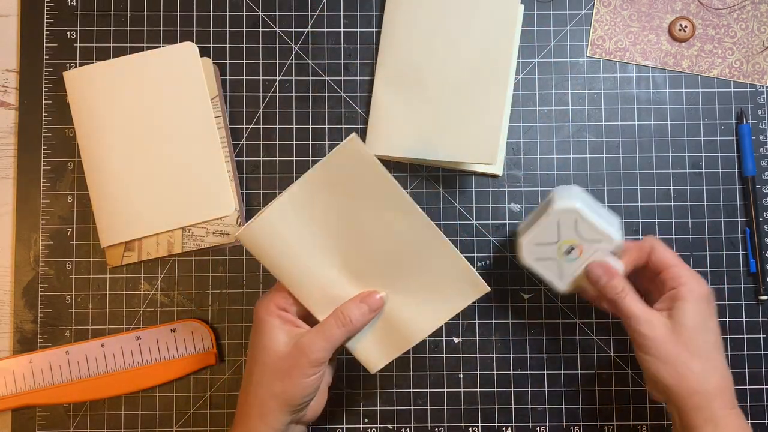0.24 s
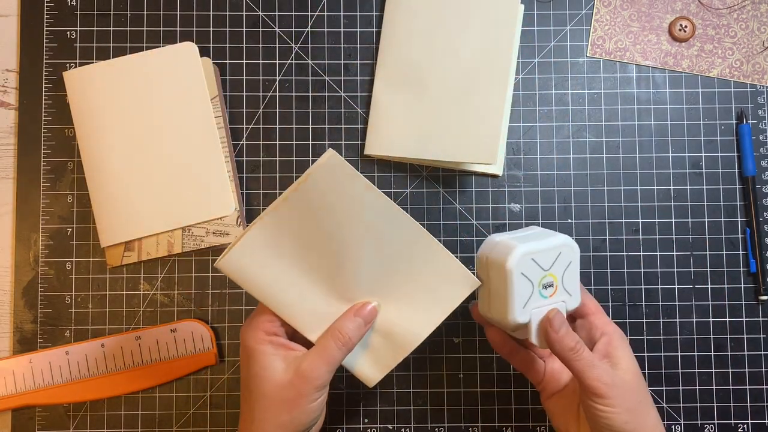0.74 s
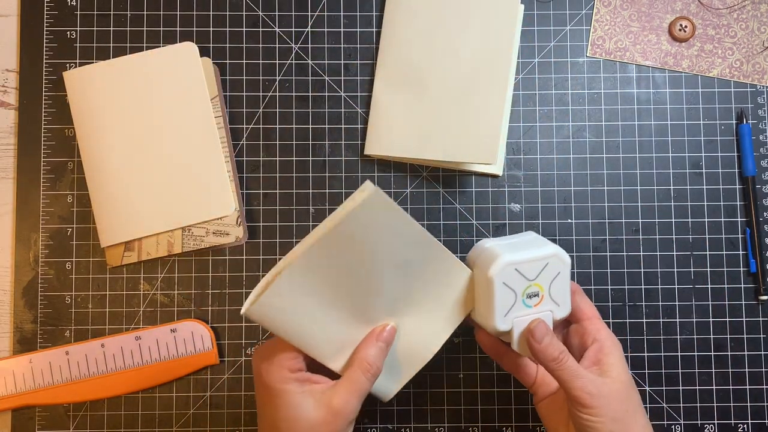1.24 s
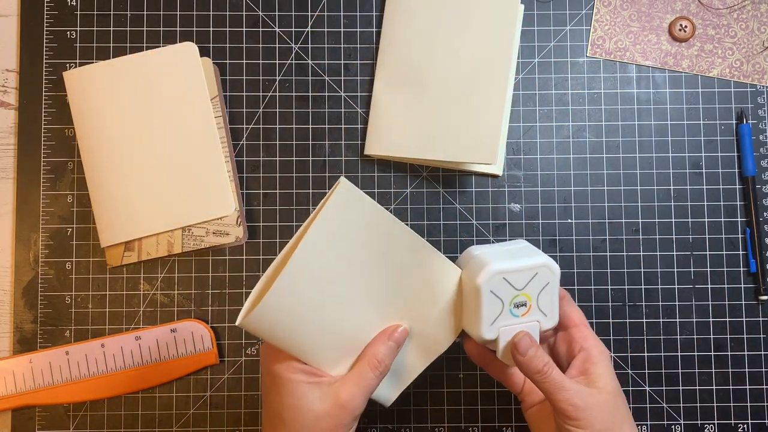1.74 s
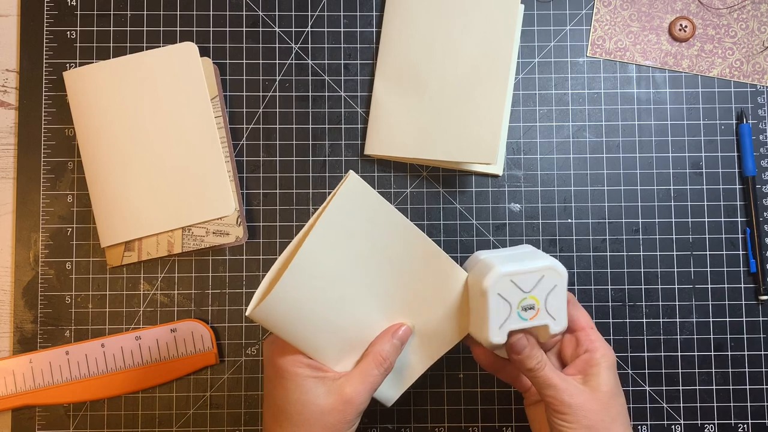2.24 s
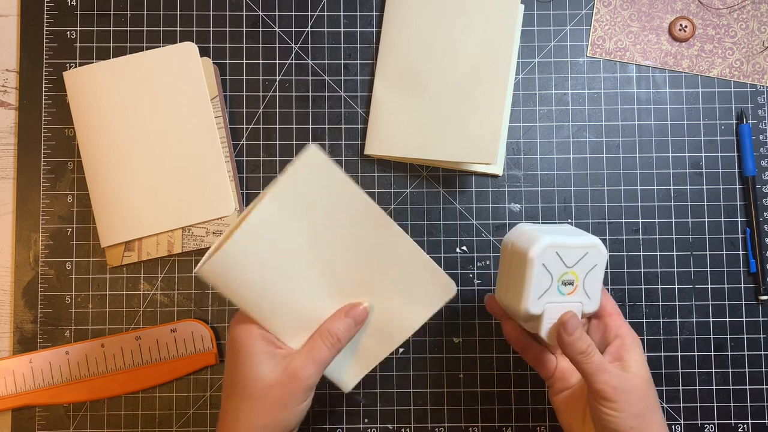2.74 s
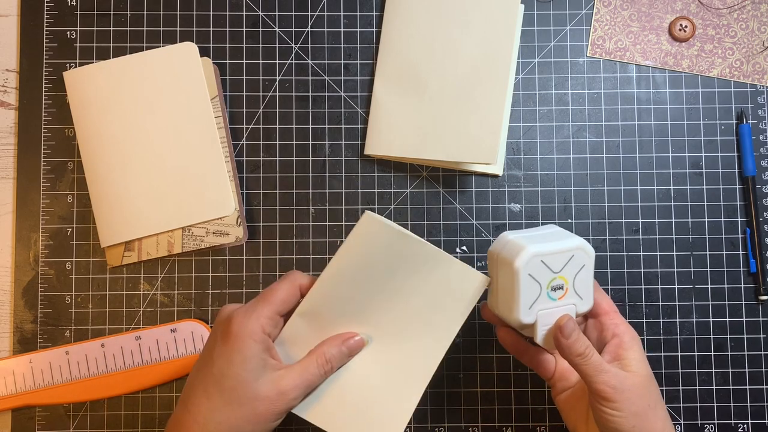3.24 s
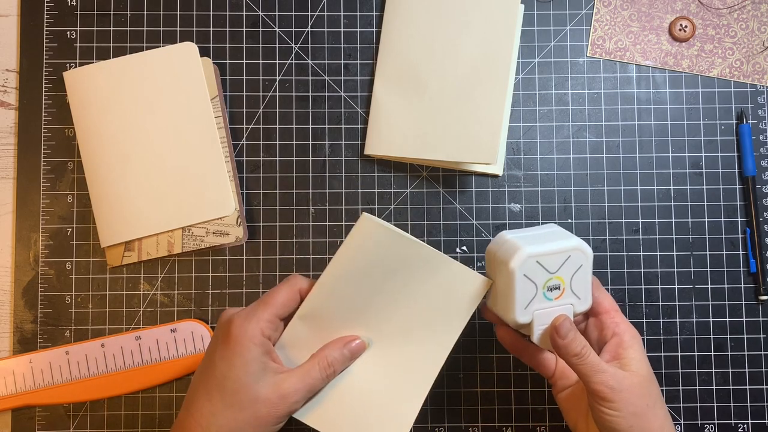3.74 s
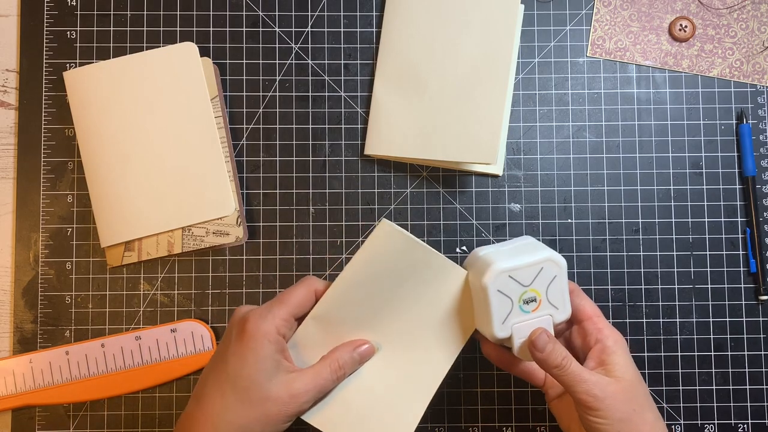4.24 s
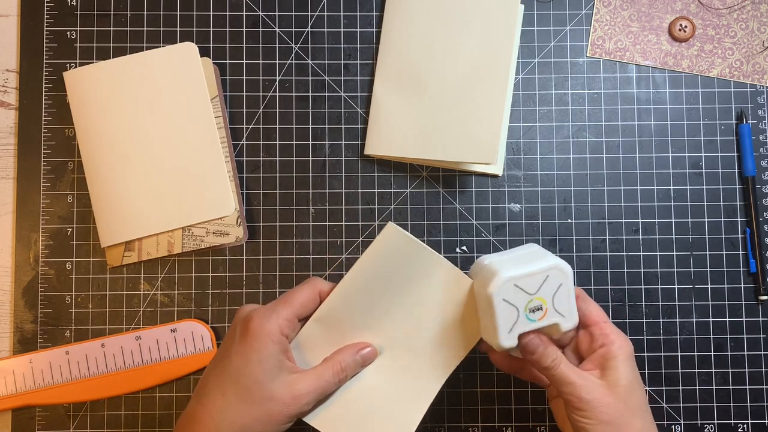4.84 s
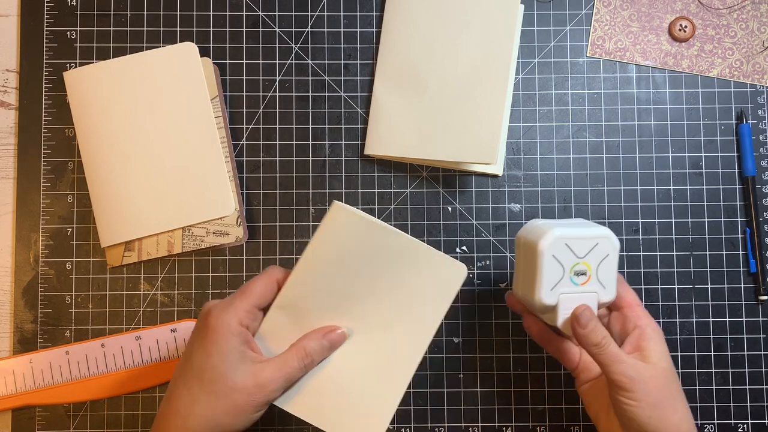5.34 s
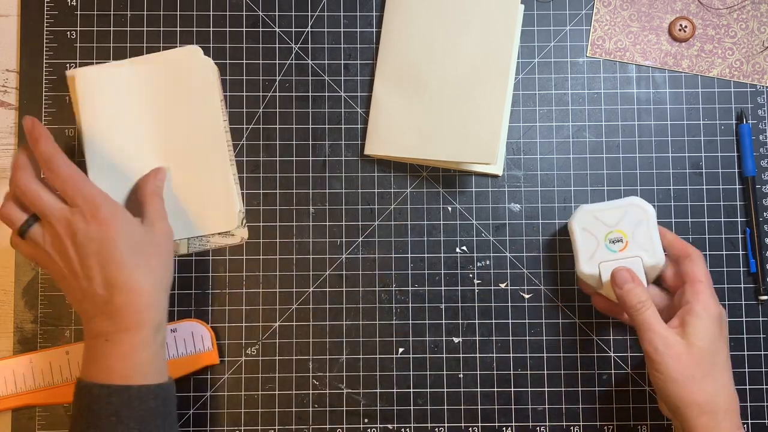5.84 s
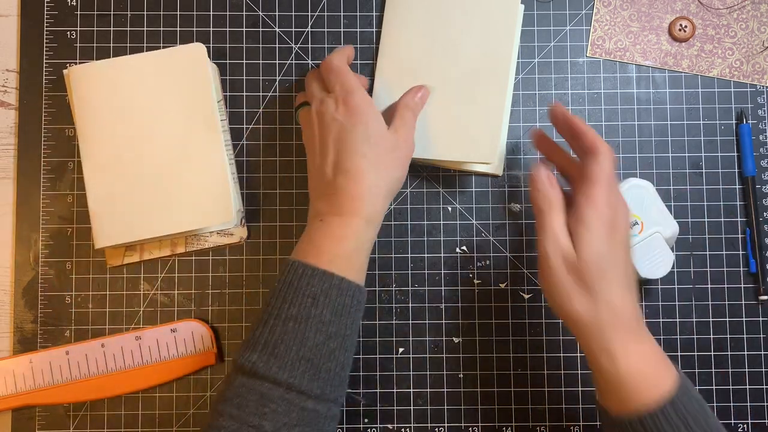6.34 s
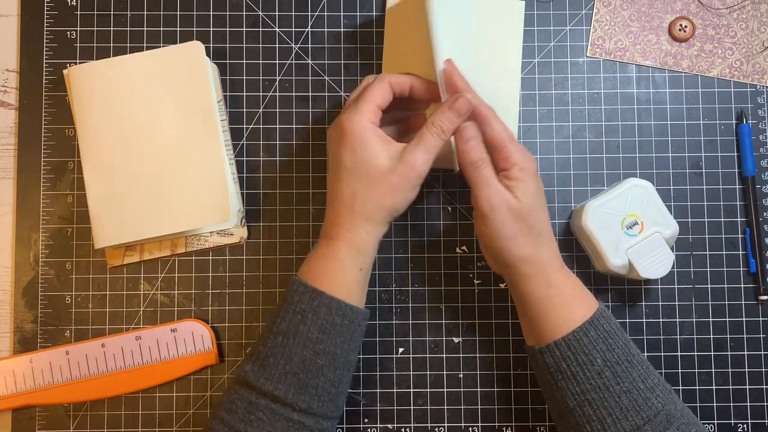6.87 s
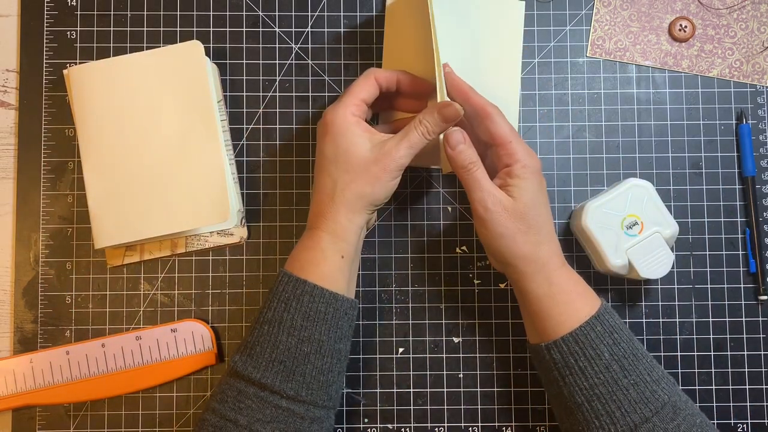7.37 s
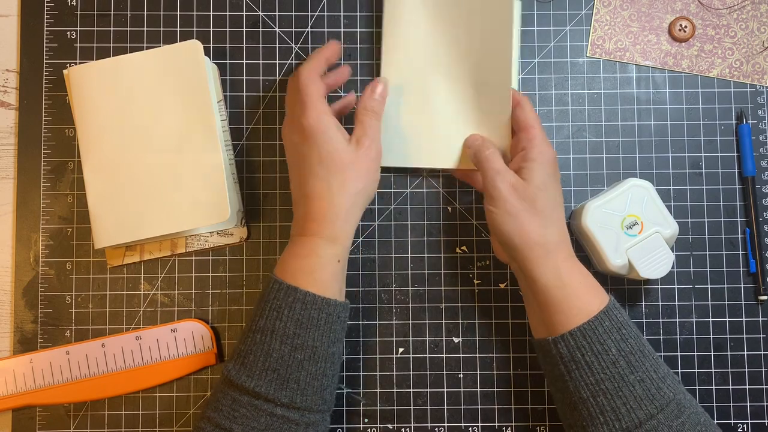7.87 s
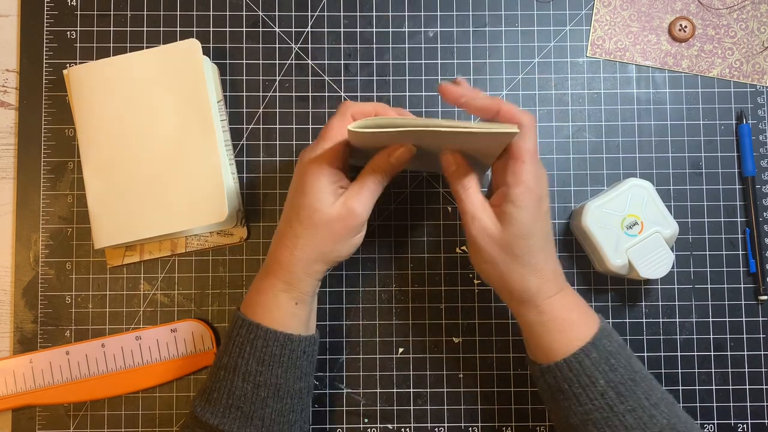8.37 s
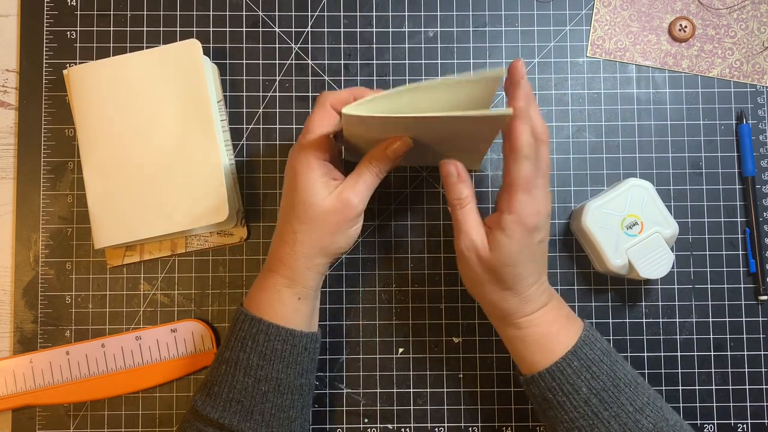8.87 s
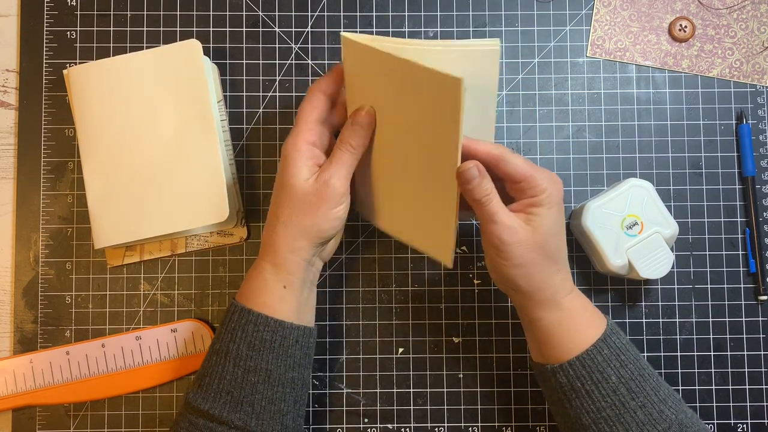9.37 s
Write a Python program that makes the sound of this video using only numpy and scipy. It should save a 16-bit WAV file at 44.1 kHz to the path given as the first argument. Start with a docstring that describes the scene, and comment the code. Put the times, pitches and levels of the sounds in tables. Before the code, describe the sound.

Card slides and ticks lightly in the hands at the start, with a few soft bumps on a table. At about 2.2 seconds a plastic corner punch snaps sharply through the folded card; its lever clicks back near 2.4 seconds and the steel spring rings faintly for about a second. Quiet rustles and scattered ticks follow. A second snap comes at about 4.8 seconds, with release clicks and a brief paper scrape around 5 seconds. Near 6.1 seconds the punch is set down with a short clattering knock, the loudest sound, and its spring rings faintly again. From about 6.5 seconds to 9.5 seconds, sheets slide, flick and tap in the hands, busiest around 8 seconds. Everything is close, in a small quiet room with a faint, steady low appliance hum.

```python
"""Sheets of card slide and tick in the hands, with light knocks on a table, while appliances hum in a
small quiet room. A plastic corner punch snaps twice through folded card above a cutting mat, then is
set down. Friction makes the sheets hiss; impacts excite the damped modes of housing and table, and
the punch's steel spring sings on in free vibration. Two close microphone ports hear everything with
a fixed phase lead between them."""
import sys
import numpy as np
from scipy import signal
from scipy.fft import rfft, irfft, next_fast_len
from scipy.io import wavfile
from scipy.ndimage import uniform_filter1d, map_coordinates

SR = 44100
rng = np.random.default_rng(int(sys.argv[2]) if len(sys.argv) > 2 else 0)


def dump_mix(stems):
    """Bounce the given channels to the path in sys.argv[1] as a 16-bit WAV at rate SR."""
    frames = np.atleast_2d(stems).T  # one column per channel
    limited = np.clip(frames, -1, 1)  # hard clip at full scale
    pcm = np.round(limited * 32767).astype(np.int16)
    wavfile.write(sys.argv[1], SR, pcm)


N = 423801
BEFORE = SR // 100  # samples of build-up ahead of each contact

# Cuts: (touch [s], break [s], lever let go [s], break level [dB], bite re break [dB], spring level [dB])
CUTS = [(2.1748, 2.2128, 2.39, -16, -11.5, -56.5), (4.7408, 4.77, 4.94, -15, -8.5, -63.5)]


def amp(db):
    """Amplitude ratio of a level in decibels."""
    return 10 ** (np.asarray(db) / 20)


def unit(x):
    """Normalisation to an rms of 1."""
    return x / np.sqrt(np.mean(x ** 2) + 1e-20)


def along(points, hz):
    """Interpolation of (frequency [Hz], value) points on a logarithmic axis."""
    f, v = np.transpose(points)
    return np.interp(np.log(hz + 1), np.log(f + 1), v)


def wobble(rate):
    """Random modulation: a smooth curve with rate knots a second."""
    return map_coordinates(rng.standard_normal(int(N * rate / SR) + 4), [np.arange(N) * rate / SR])


def swell(count, rise, fall):
    """Exponential growth up to sample BEFORE, then decay; time constants in seconds."""
    t = (np.arange(count) - BEFORE) / SR
    return np.exp(np.minimum(t / rise, -t / fall))


def filtered(x, response):
    """Linear filtering: the spectrum of x times a complex frequency response."""
    n = x.shape[-1]
    m = next_fast_len(n + 8192)
    return irfft(rfft(x, m) * response(np.fft.rfftfreq(m, 1 / SR)), m)[..., :n]


def resonances(modes):
    """Modal response: damped resonators of alternating sign, summed."""
    return lambda f: sum((-1) ** k * amp(db) * 1j * f * width / (hz * hz - f * f + 1j * f * width)
                         for k, (hz, width, db) in enumerate(modes))


def paired(noise, gain):
    """Partial coherence: two independent noises mix as sum and difference at the ports."""
    # Likeness of the ports: (frequency [Hz], correlation [ratio])
    likeness = [(60, 1), (300, 0.21), (1400, 0.16), (3500, 0.98), (6000, 0.78), (8600, 1), (11000, .9),
                (16000, 1)]
    turn = lambda hz: np.arccos(np.clip(along(likeness, hz), 0, 1)) / 2
    mid, side = filtered(noise, lambda hz: gain(hz) * [np.cos(turn(hz)), np.sin(turn(hz))])
    return np.array([mid + side, mid - side])


def rush(spectrum, patchy_db=0, grain=1):
    """Modulated two-port noise of rms 1: bands drift in gain, and a grain envelope roughens it."""
    bands = signal.stft(grain * rng.standard_normal((2, N)), nperseg=256)[2]
    drift = uniform_filter1d(rng.standard_normal(bands.shape[1:]), size=3, axis=0)
    drift = uniform_filter1d(drift, size=30, axis=1)
    noise = signal.istft(bands * amp(patchy_db * unit(drift)), nperseg=256)[1][:, :N]
    return unit(paired(noise, lambda hz: amp(along(spectrum, hz))))


def add(track, s, sound):
    """Superposition of a sound on a track, with its contact at time s."""
    part = track[round(s * SR) - BEFORE:][:len(sound)]
    part += sound[:len(part)]


def jolt(body, rise, fall, push, rough, rattle):
    """Impact excitation: an impulse, a rough push and a weaker rattle drive a body's modes; energy 1."""
    n = SR // 4
    noise = rng.standard_normal(n)
    force = (push + rough * noise) * swell(n, rise, fall)
    force[BEFORE] += 1
    scatter = rng.standard_normal((len(body), 2))  # every blow lands and is held differently
    gripped = [(hz * (1 + .015 * a), width, db + 1.5 * b)
               for (hz, width, db), (a, b) in zip(body, scatter)]
    loose = [(hz, 3.2 * width, db) for hz, width, db in gripped]  # the rattle spreads around each mode
    ring = filtered(force, resonances(gripped))
    ring += filtered(rattle * noise * swell(n, rise, .014), resonances(loose))
    return ring / np.linalg.norm(ring)


def background():
    """Forced vibration: motor and mains tones waver in level and phase over steady room noise."""
    # Appliance tones: (frequency [Hz], level [dB], waver [dB])
    tones = [(58.7, -53.5, 2), (120, -63, 0.5), (52, -66, -4), (107, -79, 3.5), (171, -77, 0.5),
             (239, -79.5, -0.5)]
    # Room noise: (frequency [Hz], level [dB])
    air = [(25, -32), (50, -5.5), (90, 6), (150, -3), (300, -12.5), (600, -26), (1500, -29), (5000, -32),
           (9000, -33), (16000, -36.5)]
    t = np.arange(N) / SR
    hum = sum(amp(db + waver * wobble(3.5)) * np.sin(2 * np.pi * hz * t + 0.39 * wobble(5.3))
              for hz, db, waver in tones)
    return hum + amp(-66.5 + 0.55 * wobble(1.3)) * rush(air)


def sheets():
    """Friction noise: fibres catch in clumps and crinkle; broad faces boom and edges hiss."""
    # Slides and flicks: (start [s], end [s], level [dB], dullness [dB])
    strokes = [(0.023, 0.143, -64.5, -9), (0.181, 0.173, -58, -8), (0.245, 0.259, -63, 7),
               (0.343, 0.426, -74, -4.5), (1.228, 1.32, -66.5, 10.5), (1.279, 1.403, -58, -18),
               (1.412, 1.543, -72.5, 7.5), (1.768, 1.776, -66.5, 10), (2.419, 2.458, -63, 8),
               (2.473, 2.596, -73, 1), (2.763, 2.93, -55.5, -18), (2.951, 3.021, -73.5, 4),
               (3.151, 3.141, -64, -5), (3.485, 3.498, -74.5, 2), (4.03, 4.054, -73, -13),
               (4.086, 4.083, -54.5, 8), (4.964, 4.987, -50, 4), (5.097, 5.152, -64.5, 3.5),
               (5.409, 5.46, -66, -3.5), (5.51, 5.607, -66.5, -10), (5.68, 5.706, -75.5, -4),
               (5.757, 5.853, -60, -1), (5.937, 6.04, -77, 20.5), (6.159, 6.405, -80.5, 19.5),
               (6.414, 6.533, -72, 6), (6.656, 6.72, -77.5, 12), (6.771, 6.877, -63.5, 10),
               (6.896, 7.199, -74, 6), (7.22, 7.47, -84, 11), (7.487, 7.527, -71, -7.5),
               (7.608, 7.71, -67, -1), (7.708, 7.796, -73.5, -1), (7.827, 7.834, -56.5, 7.5),
               (7.882, 7.98, -64, 8), (7.998, 8.095, -54.5, 4.5), (8.11, 8.154, -63.5, 6.5),
               (8.183, 8.313, -72.5, -10.5), (8.337, 8.447, -64.5, 9), (8.628, 8.744, -73.5, 8),
               (8.754, 8.88, -81.5, 23), (8.899, 8.926, -65.5, 14), (8.946, 9.088, -83.5, 20),
               (9.135, 9.249, -61, 0.5), (9.285, 9.373, -67.5, -14), (9.374, 9.575, -78.5, 8)]
    # Four layers of sheet noise, low to high: (frequency [Hz], level [dB])
    flap = [(120, -16), (250, 4.5), (500, -4), (900, -1), (1500, -36.5)]
    rub = [(700, -21.5), (1100, -1), (1900, -1.5), (2800, -19)]
    scrape = [(1700, -11), (2500, -2), (4300, -2), (6200, -20)]
    hiss = [(3500, -21.5), (6000, 3), (8500, -1.5), (12000, -7.5), (16000, -21)]
    # Crinkle in each layer: (depth [ratio])
    depths = (.9, .7, 0.4, 0.2)
    # Narrow-band rubs of an edge: (start [s], end [s], frequency [Hz], level [dB])
    swishes = [(1.151, 1.257, 3550, -65), (6.92, 7.17, 3380, -77)]
    layer_db, dullness_slope = np.array([-11.5, -2.5, 0, -1.2]), np.array([1.28, 0.64, 0.023, -0.046])
    rise_db_per_s, fall_db_per_s = 540.5, 419.5
    t = np.arange(N) / SR
    power = np.zeros((4, N))
    for start, end, db, dull_db in strokes:
        near = slice(max(round((start - .1) * SR), 0), round((end + .15) * SR))
        ramp_db = np.minimum(rise_db_per_s * (t[near] - start), fall_db_per_s * (end - t[near]))
        mix_db = db + layer_db + dullness_slope * dull_db
        power[:, near] += amp(mix_db[:, None] + np.minimum(0, ramp_db)) ** 2
    clumps = amp(1.4 * wobble(35) + 1.2 * wobble(300))
    out = np.zeros((2, N))
    for layer_power, spectrum, depth in zip(power, (flap, rub, scrape, hiss), depths):
        catches = (rng.random(N) < 70 / SR) * rng.random(N)  # about 70 a second
        crinkle = uniform_filter1d(catches, size=150) * 150  # each lasts about 3 ms
        out += np.sqrt(layer_power) * rush(spectrum, patchy_db=3.3, grain=clumps * (1 + depth * crinkle))
    for start, end, hz, db in swishes:
        arch = np.sin(np.pi * np.clip((t - start) / (end - start), 0, 1)) ** .5
        out += amp(db) * arch * rush([(hz - 900, -30), (hz - 250, 0), (hz + 250, 0), (hz + 900, -30)])
    return out


def table_knocks():
    """Modal ringing of the table top, duller for softer impacts, with a bright crack at the contact."""
    # Things meeting the table: (time [s], level [dB], relative crack level [dB])
    knocks = [(0.087, -45.5, -21), (0.105, -47.5, -23), (0.111, -41.5, -27), (0.134, -40, -31),
              (0.231, -43.5, -13.5), (5.047, -41, -16.5), (5.902, -36, -32), (6.03, -24.5, -16),
              (6.052, -26.5, -10.5), (6.092, -8, -15), (6.118, -20, -25.5), (6.157, -39, -12),
              (8.344, -43.5, -7.5)]
    # Table modes: (frequency [Hz], bandwidth [Hz], level [dB])
    modes = [(75, 8, 3.5), (117.5, 30, -4), (225.3, 40.5, 1.5), (315, 13, 8), (440, 90, 0), (740, 120, -2),
             (1070, 70, -5), (1345, 150, -1.5), (2050, 200, -14)]
    soften = .22  # dB per octave lost above 500 Hz for each dB that a knock is softer
    crack_gain = lambda hz: amp(along([(800, -24.5), (2500, 3.0), (16000, -6.0)], hz))
    out, n = np.zeros(N), SR // 8
    for s, db, crack_db in knocks:
        excited = [(hz, width, level + soften * db * max(np.log2(hz / 500), 0))
                   for hz, width, level in modes]
        ring = jolt(excited, rise=0.0011, fall=0.0068, push=0.017, rough=0.054, rattle=0.024)
        add(out, s, amp(db + 18.5) * ring)
        crack = unit(filtered(rng.standard_normal(n), crack_gain))
        add(out, s, amp(db + crack_db) * swell(n, rise=0.00085, fall=0.007) * crack)
    return out


def ticks():
    """Contact transients: short bursts around the resonance of the touched sheet or housing."""
    # Ticks of edges, fingers and lever: (time [s], level [dB], pitch [Hz], bass [dB], treble [dB])
    contacts = [(0.174, -41, 3330, -26, -2), (0.498, -30.5, 2870, -53, -22.5),
                (0.514, -36.5, 2770, -43, -26), (0.938, -55, 1200, -24, -8), (0.979, -49, 2480, -37, -6),
                (1.285, -49, 750, -12, -30), (1.507, -51, 1250, -22, -35), (1.721, -30, 2080, -19.5, -22),
                (1.768, -37, 1740, -34, -24), (2.097, -50, 1940, -32, -16), (2.108, -44.5, 1590, -41, -12),
                (2.387, -42.5, 1120, -17.5, -9), (2.396, -33.5, 2080, -19, -10),
                (2.425, -29, 1820, -19, -14), (3.22, -38.5, 826, -16, -38), (3.533, -31, 2080, -20.5, -47),
                (3.799, -45.5, 3150, -27, -10), (4.073, -35, 1560, -24, -14), (4.23, -34, 2610, -47, -4),
                (4.699, -38.5, 2930, -31, -14.5), (4.965, -26, 1685, -37, -12.5),
                (4.983, -26, 1610, -24, -8.5), (4.998, -30.5, 2380, -29, -25),
                (6.677, -51, 820, -24, -12.5), (6.734, -48.5, 1080, -19, -36), (6.873, -47, 1850, -21, -15),
                (7.614, -38.5, 1650, -43, -9), (7.801, -36, 961, -19, -23), (7.966, -35, 1240, -26, -21),
                (8.003, -33.5, 1110, -24, -13), (8.367, -39.5, 1850, -17, -10),
                (8.4, -42.5, 1610, -19, -14), (8.843, -49, 1250, -7, -34), (9.142, -36, 1970, -26, -8),
                (9.175, -39, 2050, -17, -12), (9.218, -45, 520, -8, -25), (9.353, -41, 2800, -38.5, -9),
                (9.539, -43, 2730, -30.5, -46)]
    # Bass and treble parts of a tick: (frequency [Hz], level [dB])
    thump = [(150, 1), (500, 17.5), (1100, 13.5), (2500, -5.5)]
    sheen = [(3000, -10), (8000, 5.5), (16000, -1)]
    below_db_per_octave, above_db_per_octave = 19, 7.5
    out, n = np.zeros(N), SR // 8
    for s, db, pitch_hz, bass_db, treble_db in contacts:
        def colour(hz):
            octaves = np.log2((hz + 1) / pitch_hz)
            body = amp(np.minimum(below_db_per_octave * octaves, -above_db_per_octave * octaves))
            return body + amp(bass_db + along(thump, hz)) + amp(treble_db + along(sheen, hz))
        force = rng.standard_normal(n)
        force[BEFORE] += 3.5
        burst = unit(filtered(force, colour)) * swell(n, rise=0.0012, fall=0.0033)
        ring = filtered(burst, resonances([(pitch_hz, 800, -5)]))
        add(out, s, amp(db - 7.5) * (burst + ring))
    return out


def punch():
    """Shear fracture: the blade touches, crunches, bites, breaks through and stops, jolting the housing."""
    # Plastic housing modes: (frequency [Hz], bandwidth [Hz], level [dB])
    shell = [(520, 150, -20.5), (1330, 200, -7.5), (1540, 190, 0), (2100, 650, -9.5), (3000, 600, -10.5),
             (4120, 280, 1), (5301, 1300, -12), (6400, 1600, -15), (8630, 580, -14), (12200, 2700, -16)]
    bite_s, stop_s, give_s = 0.0037, .0045, 0.0053
    touch_db, stop_db, crunch_db, give_db = -36.5, -10.5, -39, -15.5  # relative to the break
    out = np.zeros(N)
    for touch, snap, _, db, bite_db, _ in CUTS:
        blows = (touch, touch_db), (snap - bite_s, bite_db), (snap, 0), (snap + stop_s, stop_db)
        for s, relative_db in blows:
            ring = jolt(shell, rise=.0009, fall=0.0025, push=0.036, rough=.17, rattle=0.011)
            add(out, s, amp(db + relative_db) * np.sqrt(SR / 100) * ring)  # level taken over 10 ms
        # Fibres crunch steadily, then give way just before the bite.
        t = np.arange(touch - snap, -bite_s, 1 / SR)
        fibres = unit(filtered(rng.standard_normal(len(t)), lambda hz: 0.52 + resonances(shell)(hz)))
        envelope = amp(db + crunch_db) + amp(db + give_db) * np.exp((t + bite_s) / give_s)
        out[round(touch * SR):][:len(t)] += envelope * fibres
    return out


def spring():
    """Free vibration: the coil's fluttering modes ring higher while squeezed, until the lever moves."""
    # Modes of the squeezed and the free coil: (frequency [Hz], level [dB], decay time T60 [s])
    pressed = [(960.4, 0.5, 1.2), (1728, -11, .7), (1776, -9, .7), (2660, -8.5, .9), (2692, -10.5, .9),
               (3150, -15.5, .6)]
    relaxed = [(812.5, 9, 2.1)]
    # Ringing of the free coil: (start [s], end [s], level [dB])
    releases = [(2.425, 3.513, -66.5), (4.97, 5.59, -81), (6.16, 6.87, -62.5)]
    settle_s = .0135
    squeezes = [(snap + settle_s, let_go, db) for _, snap, let_go, _, _, db in CUTS]
    out = np.zeros(N)
    for modes, spells in ((pressed, squeezes), (relaxed, releases)):
        for start, end, db in spells:
            t = np.arange(round((end - start) * SR)) / SR
            stop = np.clip((t[-1] - t) / .015, 0, 1)
            for hz, level, t60 in modes:
                flutter_db = hz / 1000 * wobble(40)[:len(t)]
                envelope = amp(db + level - 60 * t / t60 + flutter_db) * stop
                out[round(start * SR):][:len(t)] += envelope * np.sin(2 * np.pi * hz * t)
    return out


def room(x):
    """Reverberation: reflections from table and walls form a decaying tail, partly alike at the ports."""
    # Room decay: (frequency [Hz], reverberation time T60 [s])
    decay = [(100, .3), (350, 0.22), (1500, 0.105), (4500, 0.14), (16000, 0.04)]
    hz, t, bands = signal.stft(rng.standard_normal((2, SR // 3)), SR, nperseg=256)
    bands = bands * amp(-60 * t / along(decay, hz)[:, None])
    tail = paired(signal.istft(bands, SR, nperseg=256)[1], np.ones_like)
    tail /= np.linalg.norm(tail[0])
    delayed = np.pad(x, (140, 0))  # about 3 ms
    return signal.fftconvolve(delayed[None], tail, axes=1)[:, :N]


def scene():
    """Superposition of the impacts, their reverberation, the spring, the sheets and the background."""
    hits = punch() + table_knocks() + ticks()
    return hits + amp(-13.0) * room(hits) + spring() + sheets() + background()


def record(dry):
    """Band-limited stereo pickup: each port takes half of the phase and level difference."""
    # Phase lead of the left port: (frequency [Hz], phase [rad])
    lead = [(0, 0), (340, -.25), (1500, .1), (2500, 1.2), (4500, 2), (5500, 3.7), (7600, 5.9), (8600, 6.3),
            (11700, 9.2), (12750, 9.45), (15850, 12.55)]
    # Left port minus right: (frequency [Hz], level [dB])
    balance = [(60, -2), (350, -3.5), (1300, -0.5), (2800, -3.5), (5000, 1), (16000, -1)]
    half = np.array([[.5], [-.5]])
    bass_hz, top_hz = 45, 16350

    def response(hz):
        bass_cut = (1j * hz / (bass_hz + 1j * hz)) ** 2
        top_cut = np.clip((top_hz - hz) / 500, 0, 1) ** 2
        phase = half * np.interp(hz, *np.transpose(lead))
        return bass_cut * top_cut * amp(half * along(balance, hz)) * np.exp(1j * phase)
    return filtered(dry, response)


dry = scene()
out = record(dry)
dump_mix(out)
```